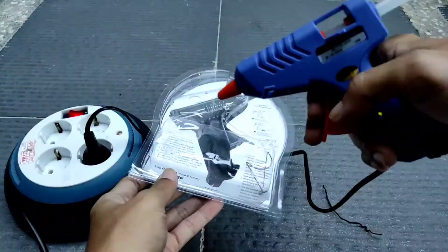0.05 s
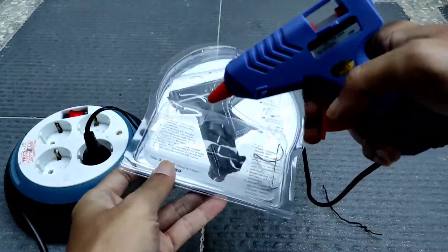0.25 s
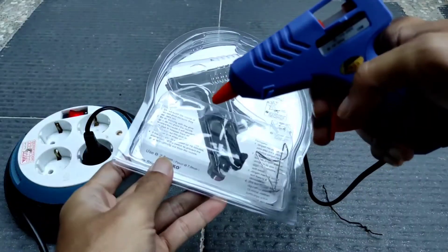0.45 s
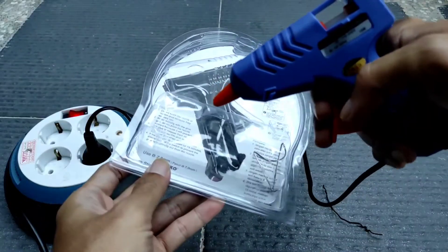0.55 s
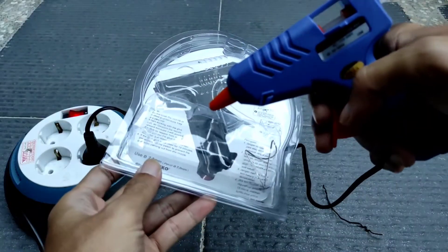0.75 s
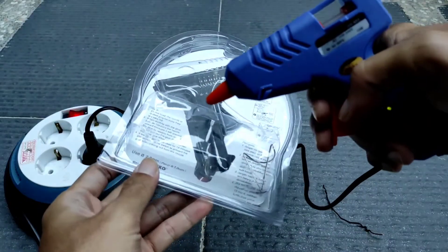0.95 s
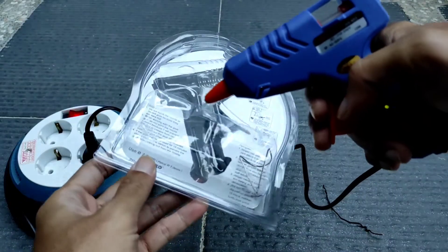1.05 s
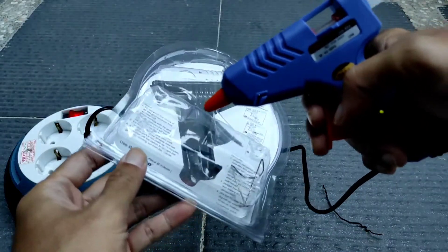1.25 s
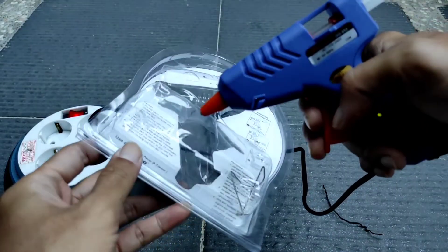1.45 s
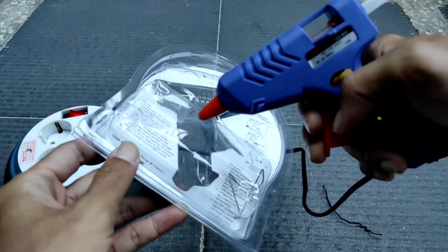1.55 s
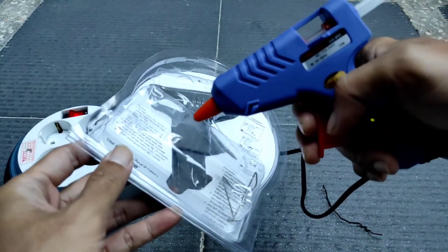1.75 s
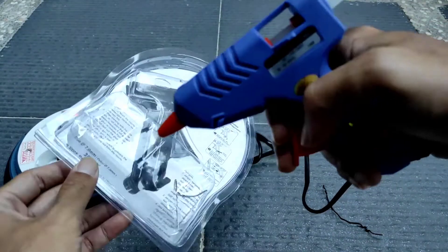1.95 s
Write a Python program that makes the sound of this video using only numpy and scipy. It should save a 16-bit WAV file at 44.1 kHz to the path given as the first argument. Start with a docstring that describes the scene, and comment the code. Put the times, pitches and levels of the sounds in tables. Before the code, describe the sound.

A small songbird sings a quick phrase of gliding chirps in an echoing space.

```python
"""A small songbird sings one quick phrase, centred on the microphone, in a hard-walled, ringing space.
Each note is one gliding whistle with weak overtones; the later notes are harsher, and three start
with a scratch. Near walls answer at once, a diffuse tail follows, and earlier song is still dying away.
Fingers brush faintly on a plastic pack, and two thin tones sound far off.
Behind it all lie a quiet, distant rumble and a faint hiss."""
import sys
import numpy as np
from scipy import signal
from scipy.fft import rfft, irfft, next_fast_len
from scipy.io import wavfile
from scipy.ndimage import uniform_filter1d, map_coordinates

SR = 44100
rng = np.random.default_rng(int(sys.argv[2]) if len(sys.argv) > 2 else 0)


def persist_wave(psi):
    """Save psi, clipped to +-1, as 16-bit WAV."""
    counts = np.round(np.clip(psi, -1, 1) * 32767).astype(np.int16)
    wavfile.write(sys.argv[1], SR, np.atleast_2d(counts).T)


N = 88200

# Contour of each note at the bird: (time [s], pitch [Hz], level [dB])
LOW_SLUR = [(0, 2943, -32), (.025, 2560, -38.5), (.048, 2407, -40.5), (.06, 2342, -38.5), (.075, 2280, -58)]
UPSWEEP = [(.209, 2600, -52), (.22, 3787, -32.5), (.231, 4444, -27.5), (.24, 5100, -27)]
WHIP = [(.239, 6400, -33), (.247, 5896, -21.5), (.254, 4760, -20), (.262, 3884, -21.5), (.272, 3250, -36)]
HIGH_SLIDE = [(.38, 6300, -44.5), (.392, 6080, -33), (.422, 5980, -26), (.432, 5600, -22),
              (.443, 4450, -28.5), (.453, 3925, -36.5)]
SHORT_SLIDE = [(.462, 5400, -38), (.485, 5090, -22.5), (.498, 4715, -25), (.515, 4310, -35.5)]
FAINT_SLIDE = [(.572, 5970, -58), (.625, 5734, -58.5), (.655, 4690, -59), (.685, 4100, -63.5)]  # far off, reaches the microphone mostly as echo
GRACE = [(.572, 3350, -52), (.584, 3730, -44), (.596, 4220, -42.5)]
WHISTLE = [(.588, 3002, -44.5), (.608, 3202, -23.5), (.638, 3188, -20.5), (.662, 3129, -23),
           (.682, 3260, -25.5)]
ARCH = [(.757, 4000, -36.5), (.767, 4600, -36.5), (.776, 5600, -24.5), (.788, 6044, -22), (.8, 5550, -19),
        (.81, 4450, -19), (.825, 3710, -26.5), (.839, 3085, -33.5)]
HOOK = [(.982, 4000, -34), (.986, 5400, -33), (.995, 5354, -25), (1.002, 6000, -24.5), (1.008, 4488, -30.5),
        (1.014, 4253, -19), (1.026, 4305, -24.5), (1.036, 4600, -36)]
LOW_ARCH = [(1.116, 3680, -38.5), (1.13, 4200, -36), (1.145, 5400, -26.5), (1.153, 4430, -33),
            (1.161, 3825, -25.5), (1.175, 3342, -33.5), (1.19, 3160, -46)]
WIDE_ARCH = [(1.621, 2100, -46), (1.626, 3447, -37), (1.632, 5013, -29.5), (1.641, 5910, -25),
             (1.647, 5900, -24), (1.654, 5183, -31), (1.664, 3990, -26.5), (1.675, 3687, -30.5),
             (1.687, 3714, -33.5)]
LAST_SLIDE = [(1.689, 6426, -37), (1.695, 5884, -27), (1.701, 5322, -24), (1.709, 5340, -26),
              (1.718, 4514, -32.5), (1.729, 4320, -29)]
# Timbre of each note: (contour, second harmonic [dB], third harmonic [dB],
# roughness [share of pitch], rasp [dB], echo send [dB])
NOTES = [(LOW_SLUR, -20.5, -28.5, 0.015, -26.5, 0), (UPSWEEP, -29.5, -51, .003, -24.5, 0),
         (WHIP, -47, -24, .003, -24, 0), (HIGH_SLIDE, -27.5, -50, 0.0075, -43, 1),
         (SHORT_SLIDE, -37, -32.5, 0.0043, -33.5, 0), (GRACE, -44, -43, .008, -36.5, 2),
         (FAINT_SLIDE, -40, -47, 0.0213, -32, 20.4), (WHISTLE, -36, -38.5, .0015, -41.5, -6),
         (ARCH, -35.5, -27, .022, -25.5, 0), (HOOK, -19.5, -37.5, 0.022, -26.5, 0),
         (LOW_ARCH, -20, -54, .045, -18.5, 4), (WIDE_ARCH, -16, -50, 0.03304, -16, 0),
         (LAST_SLIDE, -17.5, -50.5, 0.033, -19.5, 0)]
# Scratchy note onsets and touches on the pack: (centre time [s], half-width [s], level [dB])
SCRATCHES = [(0.981, 0.0025, -52), (1.124, 0.0076, -48.5), (1.624, 0.0042, -32)]
BRUSHES = [(0.019, 0.012, -44.5), (0.774, 0.085, -54.5), (.89, 0.044, -60.5)]
# Thin tones in the distance: (centre time [s], half-width [s], pitch [Hz], level [dB])
FAR_TONES = [(0.754, 0.033, 718, -55.5), (1.766, 0.1, 730, -64.5)]
# Colour of each noise: (frequency [Hz], relative level [dB])
RASP_SPECTRUM = [(300, -33), (800, -4), (1500, -7), (2300, -8), (4500, 17.5), (7000, 7), (8700, -8),
                 (10000, -5), (15000, -5)]
SCRATCH_SPECTRUM = [(900, -22), (1900, -17), (2250, 3), (2800, -17.5), (3700, 4), (5500, -7.5), (7500, -19),
                    (9200, -3.5), (11000, -7), (15000, -22.5)]
LINGER_SPECTRUM = [(1500, -28), (2200, -21), (2500, -17), (3200, -1), (3600, -13.5), (4300, -3),
                   (5200, -25.5), (6500, -26.5), (8000, -14.5), (10000, -41), (15000, -46)]
BRUSH_SPECTRUM = [(200, -8.5), (550, -2), (740, 2.5), (1100, -2), (1800, -4.5), (2300, -2), (3000, -9.5),
                  (10000, -22.5)]
RUMBLE_SPECTRUM = [(20, -7.5), (40, -4), (60, -5.5), (110, -2), (170, -6.5), (245, -5.5), (310, -12),
                   (480, -15.5), (1100, -22.5), (2200, -28.5), (3000, -64), (5000, -81.5)]
HISS_SPECTRUM = [(1500, -16), (2200, -2), (4000, 0.5), (8000, -1), (10000, -12.5), (15000, -13)]
# Loss on the way from bird to microphone: (frequency [Hz], gain [dB])
PATH_LOSS = [(1000, -6), (8900, -1), (10000, -14.5), (11000, -11), (12500, -20.5), (15000, -11)]
# How long the space rings: (frequency [Hz], time to fall 60 dB [s])
TAIL_T60 = [(500, 0.75), (3000, 0.56), (5500, 0.68), (9000, 0.56), (15000, 0.46)]
# Likeness of left and right at the microphone: (frequency [Hz], likeness [0 to 1])
STEREO_LIKENESS = [(30, 0.93), (125, 0.91), (250, 0.88), (500, 0.83), (1000, 0.36), (4000, 1),
                   (12000, 0.57)]

EDGE_S = 0.0021  # a note's fade in and out
ROUGH_KNOTS_PER_S, FLUTTER_DB_PER_ROUGHNESS = 700, 89.5
EARLY_DB, EARLY_T60_S, EARLY_DELAY_S = -2.5, 0.17, 0.0014
TAIL_DB, TAIL_DELAY_S = -8.5, 0.01
LINGER_DB, LINGER_FALL_DB_PER_S = -43.5, 91
RUMBLE_DB, RUMBLE_LEAN_DB, HISS_DB = -53, 0.95, -61.5
TOP_HZ = 15550


def bird():
    """The phrase reaches the microphone directly and off the walls; some notes ring more than others."""
    voices = [(whistled_note(*timbre), send_db) for *timbre, send_db in NOTES]
    scratch = noise(SCRATCH_SPECTRUM) * swells(SCRATCHES)
    direct = scratch + sum(voice for voice, _ in voices)
    to_walls = scratch + sum(amp(send_db) * voice for voice, send_db in voices)
    return filtered(direct + wall_echo(to_walls), lambda hz: amp(along(PATH_LOSS, hz)))


def whistled_note(contour, second_db, third_db, roughness, rasp_db):
    """One gliding whistle with two overtones and airy rasp; the unsteady voice shakes pitch and level."""
    t = np.arange(N) / SR
    times, hz, db = np.transpose(contour)
    times = np.sort(times)
    glide = uniform_filter1d(np.interp(t, times, hz), size=160)
    pitch = glide * (1 + roughness * wobble(ROUGH_KNOTS_PER_S))
    phase = 2 * np.pi * np.cumsum(pitch) / SR
    inside_s = np.minimum(t - times[0], times[-1] - t)
    gate = np.sin(np.pi / 2 * np.clip(inside_s / EDGE_S + .5, 0, 1)) ** 2
    flutter_db = FLUTTER_DB_PER_ROUGHNESS * roughness * wobble(ROUGH_KNOTS_PER_S)
    level = gate * amp(np.interp(t, times, db) + flutter_db)
    second = amp(second_db) * np.sin(2 * phase)
    third = amp(third_db) * np.sin(3 * phase) * (3 * pitch < SR / 2)  # muted where it would alias
    tone = np.sin(phase) + second + third
    return level * (np.sqrt(2) * tone + amp(rasp_db) * noise(RASP_SPECTRUM))


def wall_echo(song):
    """Near walls throw back a quick, spiky cluster; the whole space adds a long, diffuse tail."""
    hz, frame_s, bands = signal.stft(rng.standard_normal(SR), SR, nperseg=256)
    decay = amp(-60 * frame_s / along(TAIL_T60, hz)[:, None])
    t = np.arange(SR) / SR
    tail = signal.istft(bands * decay, SR, nperseg=256)[1][:SR] * (t > TAIL_DELAY_S)
    spikes = rng.standard_normal(SR) ** 3
    early = spikes * amp(-60 * t / EARLY_T60_S) * (t > EARLY_DELAY_S)
    response = amp(TAIL_DB) * tail / np.linalg.norm(tail) + amp(EARLY_DB) * early / np.linalg.norm(early)
    return signal.fftconvolve(song, response)[:N]


def lingering_echo():
    """At the start, the space still rings from the bird's previous notes."""
    t = np.arange(N) / SR
    return noise(LINGER_SPECTRUM) * amp(LINGER_DB - LINGER_FALL_DB_PER_S * t)


def pack_handling():
    """The microphone catches a soft tick and light brushing of fingers on a plastic pack."""
    return wide_noise(BRUSH_SPECTRUM) * swells(BRUSHES)


def far_tones():
    """Two thin tones in the distance, barely audible from here."""
    t = np.arange(N) / SR
    return sum(amp(db) * swell(centre, half_width) * np.sin(2 * np.pi * hz * t)
               for centre, half_width, hz, db in FAR_TONES)


def background():
    """The bed of the place: steady distant rumble, a little left of the microphone, and faint hiss."""
    left_right_db = RUMBLE_DB + RUMBLE_LEAN_DB * np.array([[1], [-1]])
    rumble = amp(left_right_db) * wide_noise(RUMBLE_SPECTRUM)
    hiss = amp(HISS_DB) * wide_noise(HISS_SPECTRUM)
    return rumble + hiss


def amp(db):
    """Decibels to gain."""
    return 10 ** (np.asarray(db) / 20)


def unit_rms(x):
    """Scale to rms 1."""
    return x / np.sqrt(np.mean(x ** 2) + 1e-20)


def along(points, hz):
    """Interpolate (frequency [Hz], value) points on a log frequency axis."""
    frequencies, values = np.transpose(points)
    return np.interp(np.log(hz + 1), np.log(frequencies + 1), values)


def wobble(knots_per_s):
    """A smooth curve through random knots."""
    return map_coordinates(rng.standard_normal(N // 8), [np.arange(N) * knots_per_s / SR], mode="wrap")


def swell(centre_s, half_width_s):
    """A bell-shaped rise and fall around a moment."""
    return np.exp(-((np.arange(N) / SR - centre_s) / half_width_s) ** 2)


def swells(events):
    """An envelope with one swell for each event."""
    return sum(amp(db) * swell(centre, half_width) for centre, half_width, db in events)


def filtered(x, response):
    """Apply a gain given as a function of frequency."""
    size = next_fast_len(N + SR // 2)
    hz = np.fft.rfftfreq(size, 1 / SR)
    return irfft(rfft(x, size) * response(hz), size)[..., :N]


def noise(spectrum):
    """Coloured noise of rms 1."""
    return unit_rms(filtered(rng.standard_normal(N), lambda hz: amp(along(spectrum, hz))))


def wide_noise(spectrum):
    """Coloured noise as a mid-side pair decoded to left and right, nearly mono in the bass."""
    def spread_angle(hz):
        return np.arccos(np.clip(along(STEREO_LIKENESS, hz), -1, 1)) / 2

    mid = filtered(noise(spectrum), lambda hz: np.cos(spread_angle(hz)))
    side = filtered(noise(spectrum), lambda hz: np.sin(spread_angle(hz)))
    return unit_rms(np.array([mid + side, mid - side]))


def scene():
    """From the microphone position: the bird and its echo in the centre, over the faint background."""
    return bird() + lingering_echo() + pack_handling() + far_tones() + background()


def record(dry):
    """The camera's microphone channel keeps nothing above its band limit."""
    return filtered(dry, lambda hz: hz < TOP_HZ)


dry = scene()
out = record(dry)
persist_wave(out)
```